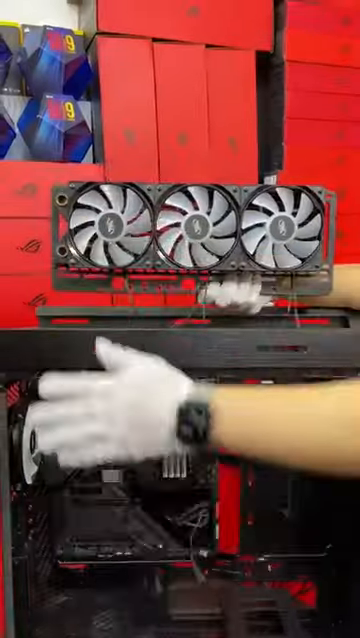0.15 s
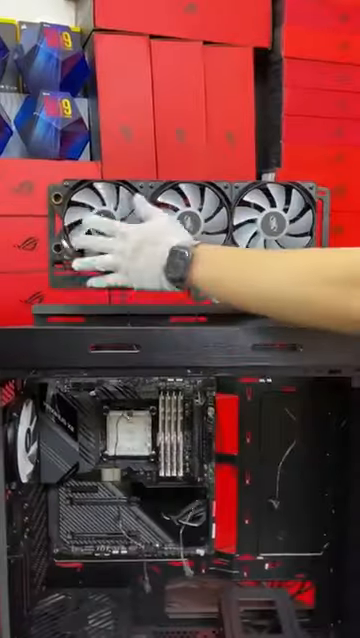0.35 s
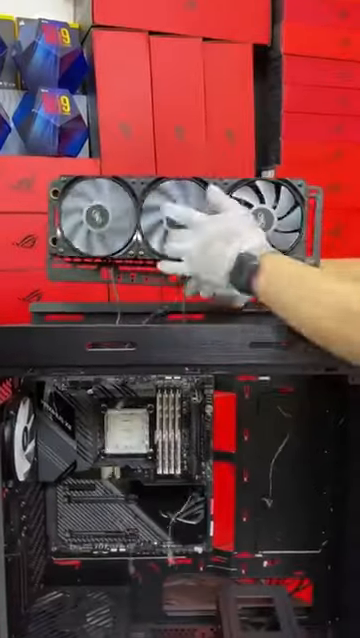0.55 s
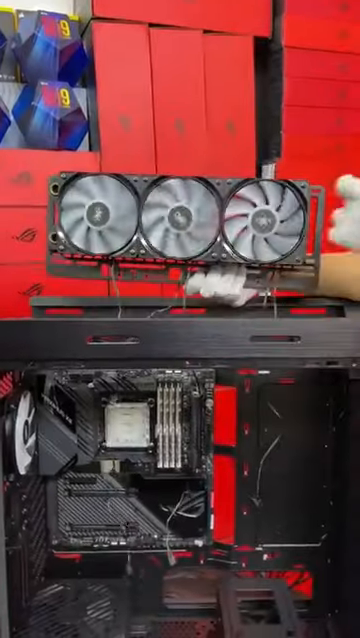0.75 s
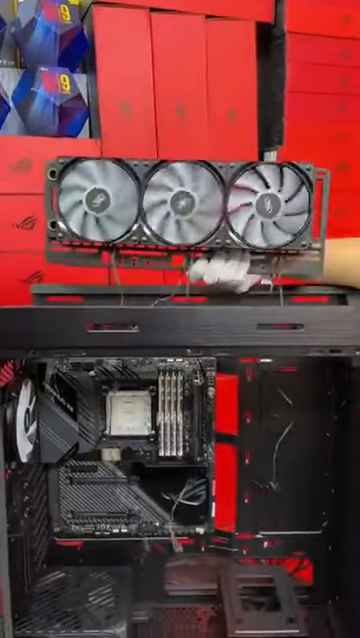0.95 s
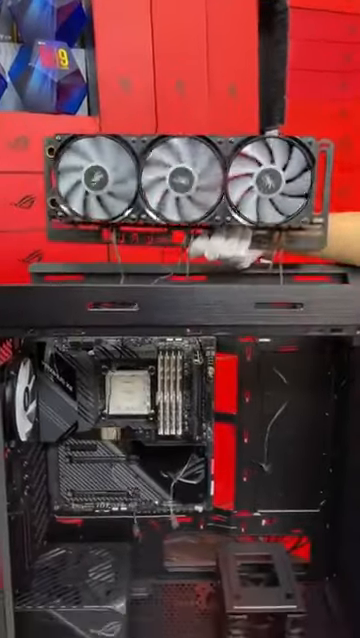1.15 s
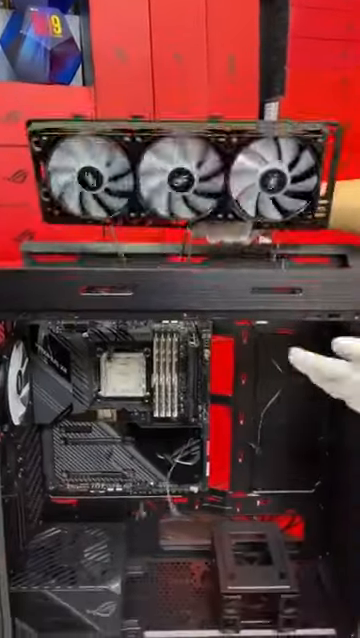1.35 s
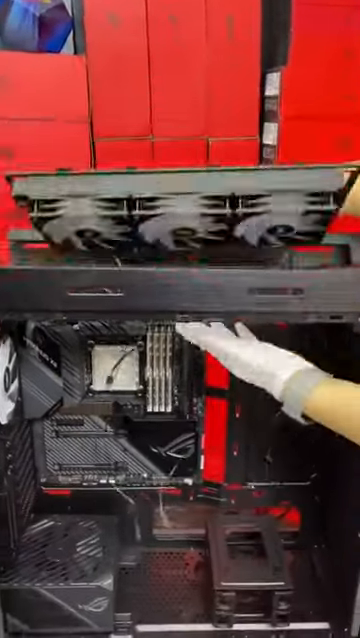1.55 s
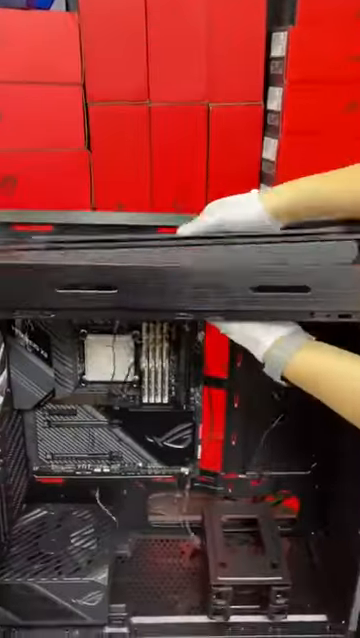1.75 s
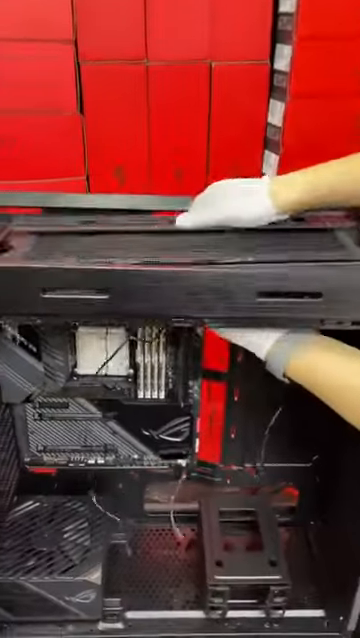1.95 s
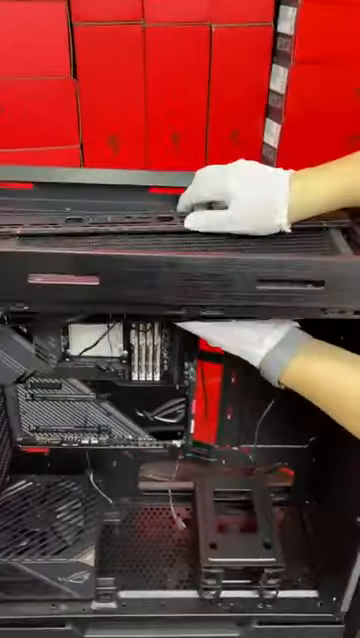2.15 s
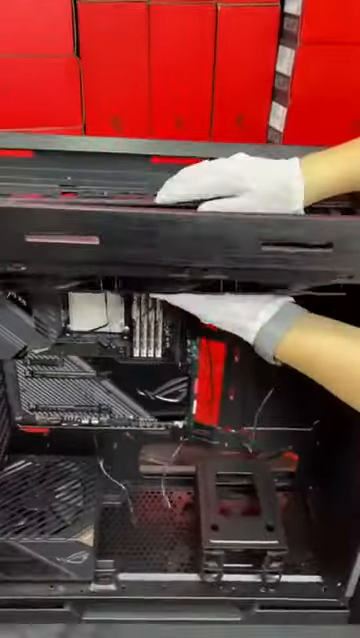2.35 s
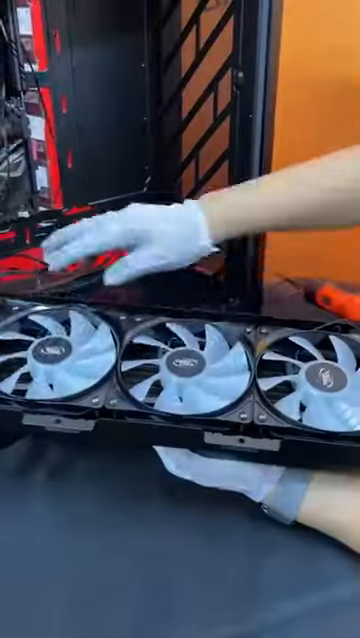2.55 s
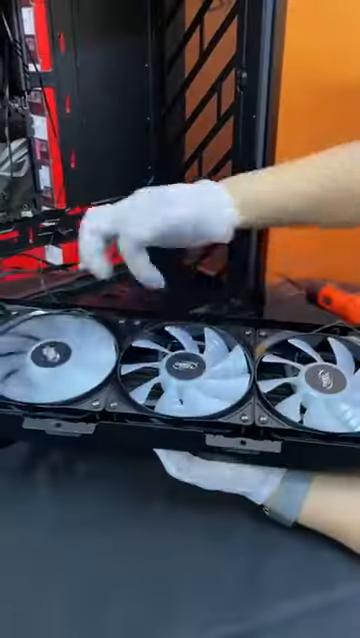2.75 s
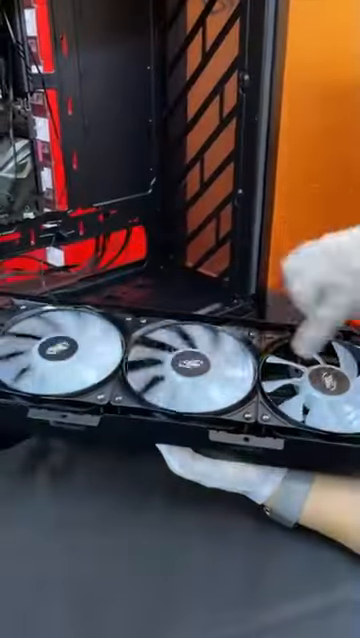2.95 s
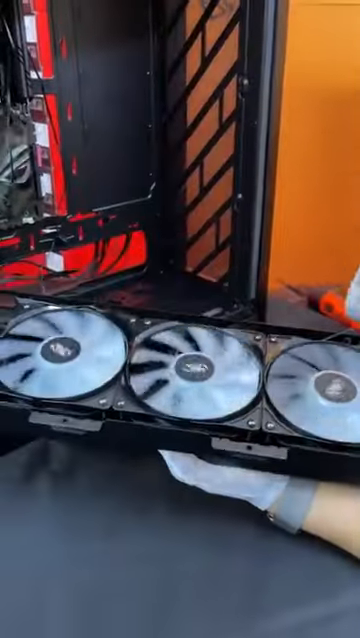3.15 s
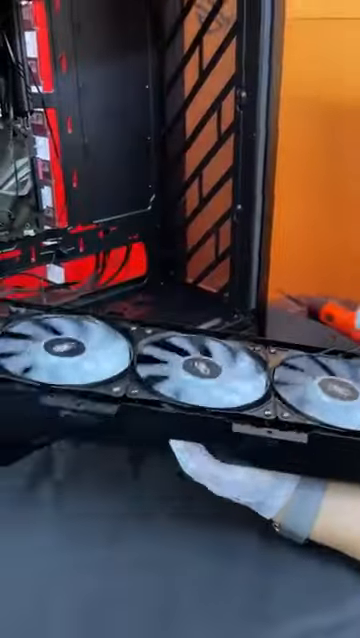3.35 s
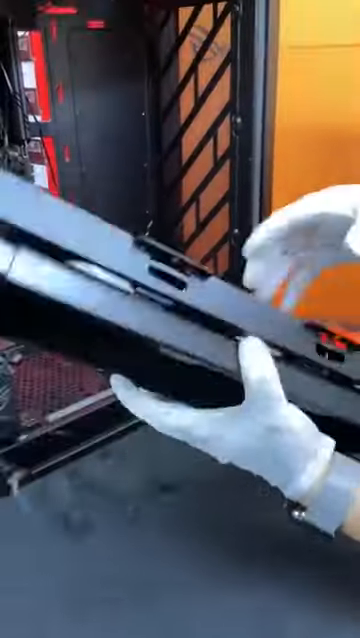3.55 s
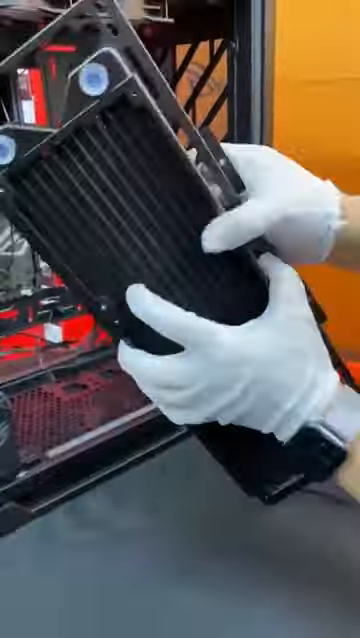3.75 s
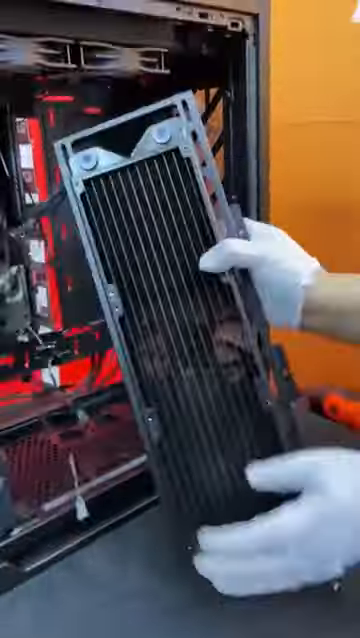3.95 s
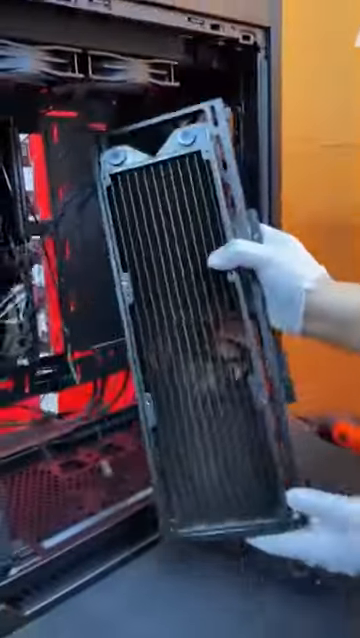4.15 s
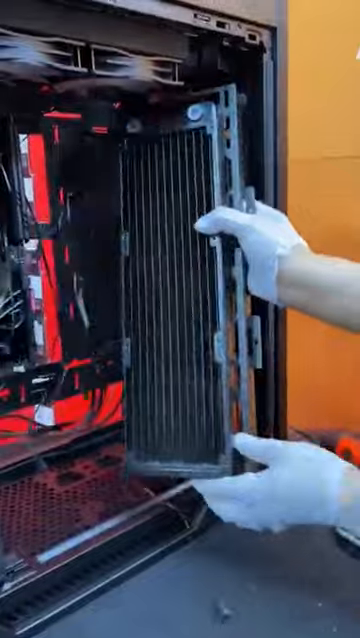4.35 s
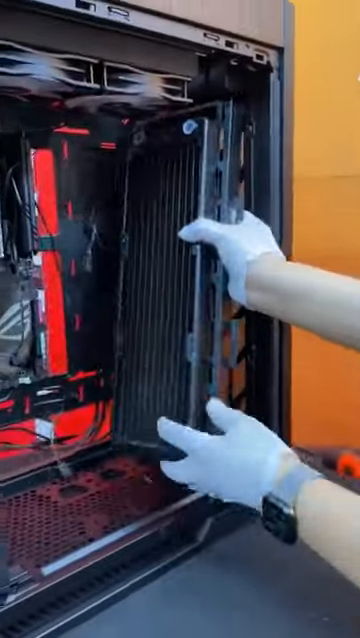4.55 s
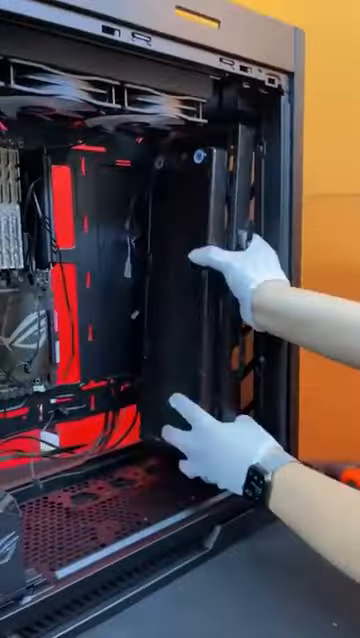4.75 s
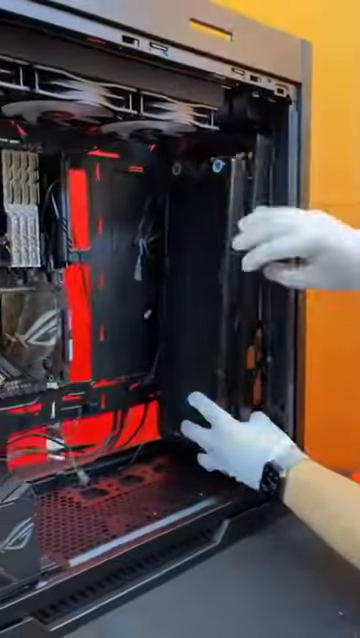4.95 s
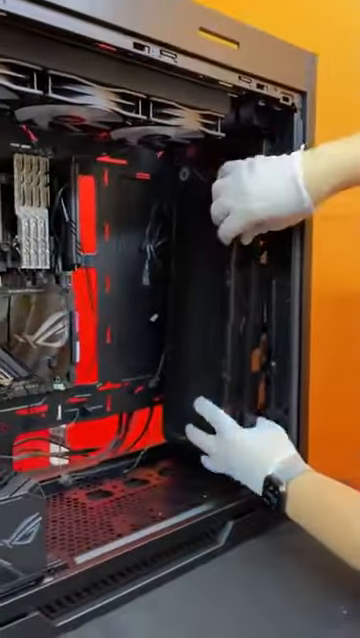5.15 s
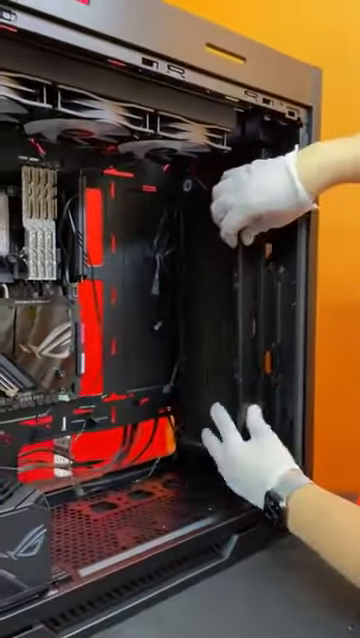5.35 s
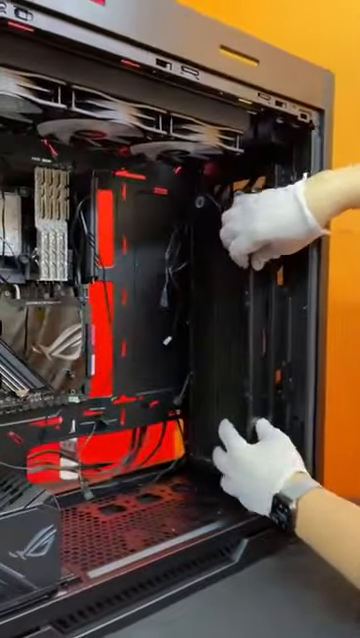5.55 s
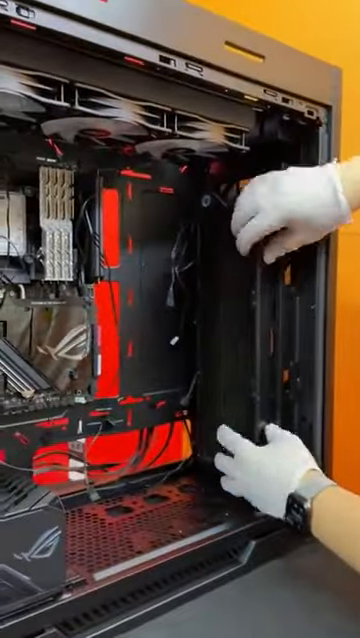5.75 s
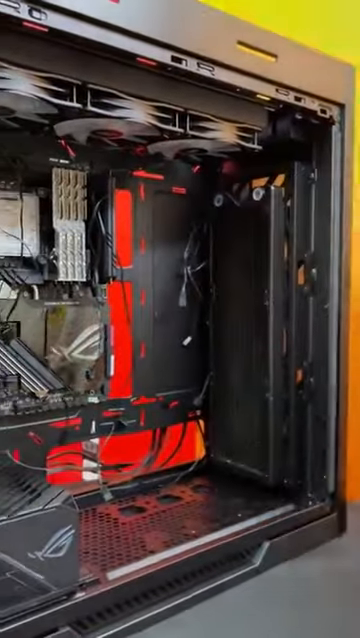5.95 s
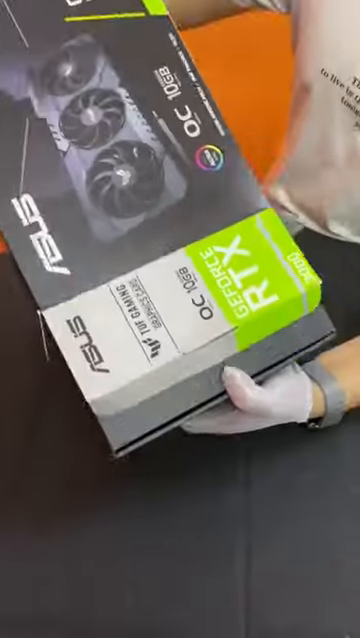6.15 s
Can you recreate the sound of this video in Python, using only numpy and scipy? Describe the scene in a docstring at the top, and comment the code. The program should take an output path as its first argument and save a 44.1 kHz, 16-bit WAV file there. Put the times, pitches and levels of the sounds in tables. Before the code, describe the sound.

Sharp plastic flicks come first, with a short ringing rotor, then a quiet gap. Sliding metal rasps with light ticks and dull thuds, followed by crisp plastic cracks and glove swishes. Heavier panel knocks, gritty scraping and brief rough groans lead to loud clanks near the end. Close stereo microphone, short room tail, low machine hum underneath.

```python
"""A three-fan radiator knocks against a steel computer case and scrapes along it in gloved hands, heard up close.
Each knock is a noise crack plus decaying sheet-metal modes; scrapes are gritty noise driving the case resonances,
with light ticks and rough groans. Plastic fan frames snap as filtered cracks, and flicked blades crack and ring
the rotor. A small room adds a short tail, over dull air, faint rumble and a wavering machine hum."""
import sys
import numpy as np
from scipy import signal
from scipy.fft import rfft, irfft, next_fast_len
from scipy.io import wavfile
from scipy.ndimage import uniform_filter1d

SR = 44100
rng = np.random.default_rng(int(sys.argv[2]) if len(sys.argv) > 2 else 0)


def waveform_to_disk(signal):
    """Save audio, clipped to [-1, 1], as 16-bit WAV at the path in sys.argv[1]."""
    frames = np.transpose(np.atleast_2d(signal))
    scaled = np.clip(frames, -1, 1) * 32767
    samples = np.round(scaled).astype(np.int16)
    wavfile.write(sys.argv[1], SR, samples)


N = 273861
RING = np.arange(SR // 2) / SR  # the half second given to every struck sound, in seconds
TOP_HZ = 15600  # upper limit of the sound

# Air and hum, with brief dips. Each row: time in seconds, air level in dB, hum gain in dB.
BACKGROUND = [(0, -50.5, 0.5), (1.3, -50.5, 2), (2.44, -40, -5), (2.46, -56, -21), (2.56, -63.5, -35),
              (2.7, -50, -4), (4.0, -52.5, -5), (6.21, -50, -3)]
# Lines of the machine hum. Each row: frequency in Hz, level in dB before the hum gain.
HUM_LINES = [(118.4, -57.5), (199.2, -63), (290.7, -56.5), (403.7, -67), (597.5, -60.5)]
# Spectrum of the room air. Each row: frequency in Hz, relative level in dB per Hz.
ROOM_COLOUR = [(15, -57), (25, -31.5), (105, -6.5), (301, -8.5), (344, -8), (591, -10), (695, -12),
               (911, -15.5), (1130, -21.5), (1890, -24), (2160, -28), (2760, -30), (5730, -40.5),
               (14000, -50.5), (16000, -47.5)]

# Fingers catch the fan blades. Each row: start in seconds, crack level in dB, rotor ring level in dB,
# contact decay in ms, tilt in dB per octave, blade resonance in Hz.
FLICKS = [(0.4337, -18.5, -23.5, 1.9, 1.5, 8560), (.623, -30, -54.5, 10, -9, 4200),
          (0.631, -20.5, -31.5, 2.5, -4, 4200), (0.635, -29.5, -42.5, 1.1, -1, 7700),
          (0.764, -33, -31.5, 11, -8, 4200), (0.781, -21, -44.5, 14, -1, 5170),
          (0.7956, -10, -31.5, 7.7, -1, 6800)]
# Fan rotor modes. Each row: frequency in Hz, relative level in dB, decay by 60 dB in seconds before the final fade.
FAN_MODES = [(694, -11, 0.14), (1490, -12, 0.27), (1667, -6, 0.33), (3330, -11.5, 0.23), (3550, -5.5, 0.36),
             (4170, 2, 0.11), (4000, -14, 0.3), (4350, -3.5, 0.13), (8540, 2.5, 0.18), (10680, -9.5, 0.13),
             (12540, -17.5, .13), (14510, -2, 0.083)]
# Spectrum of a blade crack. Each row: frequency in Hz, relative level in dB per Hz.
FAN_COLOUR = [(60, -21.5), (300, -13.5), (1000, -12.5), (1700, -13), (2800, -10), (4500, -0.5),
              (6800, -4.5), (9700, -9), (11500, -0.5), (16000, -7.5)]

# Plastic frames snap in the grip. Each row: start in seconds, crack level in dB, contact decay in ms,
# lower resonance in Hz, upper resonance in Hz.
SNAPS = [(2.577, -47, 33, 1860, 3050), (2.612, -37, 8.7, 2730, 4150), (2.66, -26, 22, 2680, 4500),
         (2.678, -23, 5.7, 2000, 2850), (2.74, -28, 24.3, 1900, 3470), (2.883, -28.5, 5.7, 2620, 4400),
         (2.909, -9, 2.1, 1370, 5240), (3.013, -31.5, 3.4, 2560, 4670), (3.0324, -13.5, 4.9, 1150, 4600),
         (3.248, -43, 9.7, 2400, 4343), (3.536, -29.5, 8.2, 2730, 4600), (3.925, -34, 2.7, 1350, 2240),
         (4.0166, -19.5, 14.6, 2200, 2400), (4.108, -28.5, 18, 1480, 2920),
         (4.168, -38.5, 11.5, 2340, 3080), (4.462, -14.5, 4.2, 1920, 2510)]
# Spectrum of a plastic snap. Each row: frequency in Hz, relative level in dB per Hz.
PLASTIC_COLOUR = [(100, -27.5), (400, -4.5), (800, -5), (1400, 1), (2600, -1), (4500, -0.5), (8000, -9.5),
                  (11000, -15), (16000, -24)]
SNAP_LIFT_DB = 10.5  # of the lower resonance
SNAP_EVEN_HZ = 3380  # upper resonance at which a snap has no tilt
SNAP_BRIGHTENING_DB = 10  # stiffer corners are brighter: tilt gained per octave of the upper resonance

# Groans of the side panel. Each row: centre in seconds, width of the swell in seconds, peak level in dB.
GROANS = [(4.653, 0.033, -26.5), (4.794, 0.063, -23.5), (5.009, .04, -32.5), (5.424, 0.14, -27),
          (5.567, 0.032, -20)]

# Strokes of a glove or an edge over a surface. Each row: time of full speed in seconds, rise in seconds,
# hold in seconds, surface hiss level in dB, case resonance level in dB.
STROKES = [(0.158, .03, 0.082, -68, -89), (1.0, 0.19, 0.074, -64, -78), (1.716, 0.11, 0.3, -39.5, -52),
           (2.187, 0.16, 0.22, -39.5, -43.5), (2.69, .04, 0.022, -27, -47.5),
           (3.462, 0.075, 0.021, -24, -47.5), (3.541, .06, .02, -34.5, -48), (3.727, .1, .14, -49.5, -73),
           (3.917, 0.052, 0.318, -52, -52), (4.425, 0.085, 0.18, -37.5, -43),
           (4.637, 0.066, 0.17, -26.5, -34.5), (4.852, 0.044, 0.18, -32.5, -34.5),
           (5.15, 0.088, .18, -38.5, -39.5), (5.407, 0.095, 0.038, -23.5, -20.5),
           (5.54, .025, 0.012, -24, -23.5), (5.775, 0.27, 0.05, -54, -61), (6.111, 0.01, 0.094, -35, -43)]
# Case resonances under a sliding edge. Each row: frequency in Hz, half-width in Hz (6 dB down), relative level in dB.
SLIDE_MODES = [(203, 13, -8.5), (377.3, 59, -9.5), (456, 74, -1.5), (968.7, 27, -0.5), (1075, 60, -4.5)]
# Radiator frame resonances under a sliding edge. Each row: frequency in Hz, relative level in dB.
FRAME_MODES = [(2480, -0.5), (3360, -2), (3880, -2.5), (4190, 2), (4690, -9), (6260, -8.5), (7580, -12)]
# Spectrum of an edge rubbing. Each row: frequency in Hz, relative level in dB per Hz.
RUB_COLOUR = [(100, -26.5), (700, -31.5), (1500, 6), (2600, 4), (4000, -2), (6000, -4), (10000, -5.5),
              (16000, -8.5)]
# Spectrum of a glove rubbing. Each row: frequency in Hz, relative level in dB per Hz.
GLOVE_COLOUR = [(100, -23), (900, -14.5), (1800, -8.5), (2700, 0.5), (4200, 1), (6500, -4), (10000, -6.5),
                (16000, -13)]
RISE_DB, RISE_CURVE = 19, 1.4  # a stroke gains this much over its rise, fastest at the start
SAG_DB_PER_S, RELEASE_DB_PER_S = 12, 422  # it tires slowly, then stops

# The sliding edge catches and lets go with a bright tick. Each row: start in seconds, level in dB.
CATCHES = [(1.4829, -33), (1.559, -30), (1.714, -37), (1.886, -30.5), (2.0866, -21.5), (2.156, -33),
           (2.2562, -26), (4.406, -26), (4.442, -25), (4.478, -17.5), (4.605, -22.5), (4.783, -24),
           (4.825, -24.5), (4.906, -25.5), (4.984, -26.5)]
CATCH_MS, CATCH_TILT_DB, CATCH_PANEL_DB = 5.8, 2, -11.5  # contact decay, tilt per octave, panel against tick
CATCH_EDGE_HZ, CATCH_EDGE_DB, CATCH_SPOT_HZ = 4100, 0.5, 435  # edge resonance, its lift, favoured panel pitch

# The radiator's weight lands on the case. Each row: start in seconds, crack level in dB, panel level in dB,
# contact decay in ms, edge resonance in Hz, pitch favoured by the struck spot in Hz.
KNOCKS = [(1.786, -19, -17, 4.5, 4570, 573), (1.795, -15.5, -19, 14, 4200, 244),
          (1.898, -28, -19, 8.3, 3200, 222), (2.101, -29, -18, 8.5, 3370, 392),
          (2.176, -31.5, -17.5, 13, 2340, 360), (2.268, -28.5, -21, 27, 3440, 204),
          (2.366, -32, -27.5, 10.6, 4570, 214), (4.282, -25, -12, 14.5, 2460, 512),
          (4.308, -19, -11.5, 9, 4000, 352), (4.323, -48, -18.5, 5, 1140, 141),
          (4.639, -38, -24, 10, 2530, 200), (5.124, -25.5, -19, 12, 2000, 480),
          (5.247, -4.5, -2, 1.5, 1160, 420), (5.4167, -14, -9, 12, 3170, 380.4),
          (5.459, -24, -22, 9.4, 3800, 440), (5.543, -7.5, -6.5, 5.1, 2130, 445)]
# Steel panel modes. Each row: frequency in Hz, relative level in dB, decay by 60 dB in seconds.
PANEL_MODES = [(123.7, -15.5, 0.46), (203, -6.5, 0.22), (229.8, 0, 0.12), (251, -9.5, 0.25),
               (340.5, -4, 0.25), (365, -4, 0.25), (404.3, -1.5, 0.13), (440, 4, 0.17), (499.4, -3.5, 0.16),
               (541.5, -6, 0.18), (615.3, -11, 0.25), (717, -18.5, 0.066), (950, -16, 0.14),
               (1193, -12, .15), (1292, -20.5, 0.48), (1990, -10.5, 0.12), (3990, -11.5, 0.073)]
# Spectrum of metal on the case. Each row: frequency in Hz, relative level in dB per Hz.
CASE_COLOUR = [(40, -18), (200, -14), (500, -31.5), (750, -1), (1100, -5), (2500, 0), (4200, 1), (7000, -4),
               (10000, -13.5), (16000, -21)]
# Spectrum of the bright tick in a blow. Each row: frequency in Hz, relative level in dB per Hz.
TICK_COLOUR = [(100, -34), (1000, -7), (3000, 1.5), (6000, -1.5), (10000, -2), (16000, -1)]
EDGE_LIFT_DB, EDGE_WIDTH_HZ = 10.5, 260  # resonance of the struck edge
SPOT_LIFT_DB, SPOT_OCTAVES = 11, 0.23  # how much, and how widely, the struck spot favours its own panel modes
KNOCK_TILT_DB, DULLING = -3, 0.21  # tilt per octave when crack equals thump; its fall per dB of extra thump


def undb(db):
    """Decibels to gain."""
    return 10 ** (np.asarray(db) / 20)


def fade(t60):
    """Exponential decay of a ring, by 60 dB in t60 seconds."""
    return np.exp(-np.log(1000) * RING / t60)


def curves(table):
    """The columns of a table, joined by straight lines in time."""
    s, *columns = np.transpose(table)
    return [np.interp(np.arange(N) / SR, s, column) for column in columns]


def add(out, s, sound):
    """Mix a sound in at a time."""
    i = int(s * SR)
    out[:, i:i + sound.shape[1]] += sound[:, :N - i]


def walk(rate):
    """Smooth random wander with a spread near 1, drawn at `rate` values per second."""
    hold = int(SR / rate)
    steps = np.repeat(rng.standard_normal(N // hold + 1), hold)
    return 1.32 * uniform_filter1d(uniform_filter1d(steps, hold), hold)[:N]


def air(size, apart_hz=2200, apart=1.0):
    """White noise at two microphone ports: alike in the bass, less so in the treble."""
    mid, side = rng.standard_normal((2, size))
    f = np.fft.rfftfreq(size, 1 / SR)
    side = irfft(rfft(side) * apart * f / np.hypot(f, apart_hz), size)
    return np.array([mid + side, mid - side]) / np.hypot(1, apart)


def colour(x, points, tilt_db=0, peaks=(), ripple_db=0, ripple_hz=130):
    """Causal filter of unit power: spectrum, tilt, (Hz, width, dB) resonances and the ripple of many lesser modes."""
    size = 2 * next_fast_len(x.shape[-1] // 2 + 1)
    f = np.maximum(np.fft.rfftfreq(size, 1 / SR), 1)
    hz, db = np.transpose(points)
    ripple = ripple_db * np.interp(f / ripple_hz, np.arange(512), rng.standard_normal(512))
    tilt = tilt_db * np.log2(np.hypot(1, f / 1500))
    gain = undb(np.interp(np.log(f), np.log(hz), db) + tilt + ripple)
    resonances = sum(undb(lift) ** 2 / (1 + (2 * (f - centre) / width) ** 2) for centre, width, lift in peaks)
    gain = gain * np.sqrt(1 + resonances)
    # folding the cepstrum gives minimum phase, so nothing sounds before the impact
    cepstrum = irfft(np.log(gain / np.sqrt(np.mean(gain ** 2))))
    cepstrum[1:size // 2] *= 2
    cepstrum[size // 2 + 1:] = 0
    return irfft(rfft(x, size) * np.exp(rfft(cepstrum)))[..., :x.shape[-1]]


def crack(contact_ms, tail_db, t60, rise_s, impact_db, impact_s=0.00089):
    """A sharp first impact straight to both ports, a burst while the surfaces chatter, then a diffuse tail."""
    impact = undb(impact_db) * np.exp(-RING / impact_s) * air(len(RING), apart=1.0)
    burst = np.exp(-RING / (contact_ms / 1000))
    tail = undb(tail_db) * np.sqrt(contact_ms / 5) * fade(t60)
    chatter = air(len(RING), apart=0.78) * np.hypot(burst, tail)
    return (impact + chatter) * (1 - np.exp(-RING / rise_s))


def ring(modes, lift_db, push_s, detune, scatter_db, port_hz=3500):
    """Decaying modes that build up during the push; high ones reach the two ports out of step."""
    hz, db, t60 = np.transpose(modes)
    pitch, size, start, lag = rng.standard_normal((4, len(hz)))
    gain = undb(db + lift_db + scatter_db * size)
    gain = gain / np.sqrt(np.sum(gain ** 2) / 2)
    lag = lag * np.minimum(hz / port_hz, .8)
    hz = hz * (1 + detune * pitch)
    out = np.zeros((2, len(RING)))
    for f, g, t, p, d in zip(hz, gain, t60, start, lag):
        phase = np.pi * p + np.array([[d], [-d]])
        out += g * fade(t) * np.sin(2 * np.pi * f * RING + phase)
    return out * (1 - np.exp(-RING / push_s))


def resonate(x, modes):
    """Steep resonances under a continuous drive, at unit level."""
    f = np.fft.rfftfreq(N, 1 / SR)
    response = sum(undb(db) / (1 + 1j * (f - hz) / width) ** 2 for hz, width, db in modes)
    y = irfft(rfft(x) * response, N)
    return y / np.std(y)


def background(waver_db=2, rumble_db=-19):
    """Dull moving air, a faint rumble that differs between the ports, and a wavering machine hum."""
    air_db, hum_db = curves(BACKGROUND)
    hum = np.zeros(N)
    for hz, db in HUM_LINES:
        level = undb(db + waver_db * walk(9.1)) * np.sqrt(2)
        pitch = hz * (1 + .005 * walk(25))
        hum += level * np.sin(2 * np.pi * np.cumsum(pitch) / SR)
    rush = colour(air(N), ROOM_COLOUR)
    low_pass = signal.butter(2, 70, fs=SR, output="sos")
    rumble = signal.sosfilt(low_pass, rng.standard_normal((2, N)))
    moving_air = rush / np.std(rush) + undb(rumble_db) * rumble / np.std(rumble)
    return undb(air_db) * moving_air + undb(hum_db) * hum


def room(x, wet_db=-14, t60=0.19):
    """Near walls return a short diffuse tail."""
    echo = air(len(RING)) * fade(t60) * (1 - np.exp(-RING / 0.0064))
    echo = echo / np.sqrt(np.sum(echo ** 2) / 2)
    return x + undb(wet_db) * signal.fftconvolve(x, echo, axes=1)[:, :N]


def fan_flicks():
    """A fingertip lets a blade go: a bright crack through that blade's resonance, and the ring of the rotor."""
    out = np.zeros((2, N))
    for s, crack_db, ring_db, contact_ms, tilt_db, blade_hz in FLICKS:
        # the shorter the contact, the more of it is the first impact
        impact_db = 13 - 5 * np.log2(max(contact_ms, 1))
        tick = crack(contact_ms, tail_db=-0.5, t60=0.15, rise_s=0.00038, impact_db=impact_db)
        tick = colour(tick, FAN_COLOUR, tilt_db, [(blade_hz, 300, 9)], ripple_db=3)
        # no two blades are quite alike, so every mode is a beating cluster
        blades = [ring(FAN_MODES, 0, push_s=.0006, detune=.006, scatter_db=1) for _ in range(3)]
        rotor = sum(blades) / np.sqrt(3)
        rotor = rotor * np.exp(-(RING / .11) ** 4)  # final fade
        add(out, s, undb(crack_db) * tick + undb(ring_db) * rotor)
    return out


def plastic_snaps(left_db=0.3):
    """Short cracks through two well-damped resonances of the fan frame, a little left of centre."""
    out = np.zeros((2, N))
    for s, crack_db, contact_ms, lower_hz, upper_hz in SNAPS:
        peaks = [(lower_hz, 240, SNAP_LIFT_DB), (upper_hz, 320, 9)]
        tilt_db = SNAP_BRIGHTENING_DB * np.log2(upper_hz / SNAP_EVEN_HZ)
        impact_db = 15 - 6 * np.log2(max(contact_ms, 1))
        snap = crack(contact_ms, tail_db=-6.5, t60=0.14, rise_s=0.000536, impact_db=impact_db, impact_s=0.002)
        snap = colour(snap, PLASTIC_COLOUR, tilt_db, peaks, ripple_db=5.5)
        add(out, s, undb(crack_db) * snap)
    return out * undb([[left_db], [-left_db]])


def groans(hz=975, jitter=0.0214, rough_db=3):
    """Stick-slip locks onto a panel mode in short, rough swells."""
    t = np.arange(N) / SR
    swell = sum(undb(db) * np.exp(-(2 * (t - s) / length) ** 2) for s, length, db in GROANS)
    roughness = undb(rough_db * walk(150))
    pitch = hz * (1 + jitter * walk(220))
    return swell * roughness * np.sin(2 * np.pi * np.cumsum(pitch) / SR)


def stroke(s, rise_s, hold_s):
    """Gain of one stroke: it gathers speed, sags while it lasts and dies away."""
    t = np.arange(N) / SR - s
    rise_db = -RISE_DB * np.maximum(-t / rise_s, 0) ** RISE_CURVE
    sag_db = -SAG_DB_PER_S * np.clip(t, 0, hold_s)
    release_db = -RELEASE_DB_PER_S * np.maximum(t - hold_s, 0)
    return undb(rise_db + sag_db + release_db)


def friction(catches_per_s, catch_s, spread_db, smooth):
    """Noise gated by tiny catches and slips of very unequal size, over a smooth rub."""
    caught = rng.random(N) < catches_per_s / SR
    catches = caught * undb(spread_db * np.minimum(rng.exponential(size=N), 4))
    grip = smooth + signal.lfilter([1], [1, -np.exp(-1 / (catch_s * SR))], catches)
    return air(N) * grip / np.sqrt(np.mean(grip ** 2))


def scratches(count=2400, size=2400, t60=.06, detune=0.018):
    """Burrs catch at random and briefly ring the frame, near one of its resonances each time."""
    t = np.arange(size) / SR
    decay = np.exp(-np.log(1000) * t / t60)
    out = np.zeros((2, N))
    for (when, which, side), (pitch, force) in zip(rng.random((count, 3)), rng.standard_normal((count, 2))):
        hz, db = FRAME_MODES[int(which * len(FRAME_MODES))]
        lag = np.pi * (side - .5) * np.array([[1], [-1]])
        grain = np.sin(2 * np.pi * hz * (1 + detune * pitch) * t + lag) * decay
        add(out, when * N / SR, undb(db + 2 * force) * grain)
    return out / np.std(out)


def sliding(flutter_db=3.5):
    """A glove alone just hisses; an edge pressed on the case scratches and drives its resonances."""
    hiss, case = np.full((2, N), 1e-9)  # just above silence, for the division below
    for s, rise_s, hold_s, hiss_db, case_db in STROKES:
        speed = stroke(s, rise_s, hold_s)
        hiss = np.maximum(hiss, undb(hiss_db) * speed)
        case = np.maximum(case, undb(case_db) * speed)
    drive = friction(catches_per_s=500, catch_s=.0015, spread_db=2.7, smooth=1.1)
    pressure = np.minimum(case / hiss, 1)
    edge = .85 * (colour(drive, RUB_COLOUR) + undb(-2) * scratches())
    glove = colour(air(N), GLOVE_COLOUR) * undb(flutter_db * walk(120))
    surface = np.sqrt(pressure) * edge + np.sqrt(1 - pressure) * glove
    return hiss * surface + case * resonate(drive, SLIDE_MODES)


def blow(crack_db, panel_db, contact_ms, tilt_db, edge_hz, edge_db, spot_hz, tick_db=-4, hardening=0.15):
    """Metal meets metal; the spot that is struck decides which edge and panel modes ring most."""
    clack = crack(contact_ms, tail_db=-3, t60=0.16, rise_s=0.00052, impact_db=7.0)
    clack = colour(clack, CASE_COLOUR, tilt_db, [(edge_hz, EDGE_WIDTH_HZ, edge_db)], ripple_db=4.0)
    # harder blows add a disproportionately bright tick
    tick = crack(4.74, tail_db=3, t60=0.12, rise_s=0.000063, impact_db=9)
    tick = colour(tick, TICK_COLOUR, tilt_db)
    clack = clack + undb(tick_db + hardening * crack_db) * tick
    octaves_away = np.log2(np.array(PANEL_MODES)[:, 0] / spot_hz)
    lift_db = SPOT_LIFT_DB * np.exp(-(octaves_away / SPOT_OCTAVES) ** 2)
    panel = ring(PANEL_MODES, lift_db, push_s=.003, detune=.011, scatter_db=1)
    return undb(crack_db) * clack + undb(panel_db) * panel


def edge_catches():
    """Ticks of the sliding edge, set alike but for their strength; they barely stir the panel."""
    out = np.zeros((2, N))
    for s, db in CATCHES:
        tick = blow(db, db + CATCH_PANEL_DB, CATCH_MS, CATCH_TILT_DB, CATCH_EDGE_HZ, CATCH_EDGE_DB, CATCH_SPOT_HZ)
        add(out, s, tick)
    return out


def case_knocks(left_db=0.5):
    """The radiator bumps the case, slightly to the left; the more of a blow goes into the panel, the duller its crack."""
    out = np.zeros((2, N))
    for s, crack_db, panel_db, contact_ms, edge_hz, spot_hz in KNOCKS:
        tilt_db = KNOCK_TILT_DB - DULLING * (panel_db - crack_db)
        add(out, s, blow(crack_db, panel_db, contact_ms, tilt_db, edge_hz, EDGE_LIFT_DB, spot_hz))
    return out * undb([[left_db], [-left_db]])


def scene():
    """All the handling in the room, over the background."""
    fans = fan_flicks() + plastic_snaps()
    scrapes = groans() + sliding() + edge_catches()
    return background() + room(fans + scrapes + case_knocks())


def record(dry, low_hz=55):
    """The microphones shed rumble, round the loudest peaks and cut the top."""
    high_pass = signal.butter(2, low_hz, "high", fs=SR, output="sos")
    rounded = 1.1 * np.tanh(signal.sosfilt(high_pass, dry) / 1.1)
    low_pass = signal.ellip(8, .2, 70, TOP_HZ, fs=SR, output="sos")
    return signal.sosfilt(low_pass, rounded)


dry = scene()
out = record(dry)
waveform_to_disk(out)
```